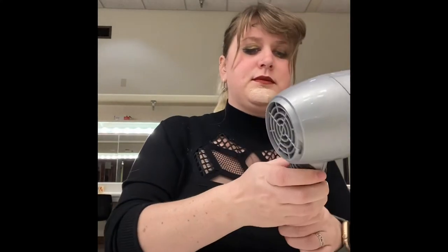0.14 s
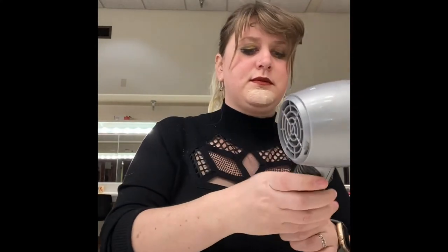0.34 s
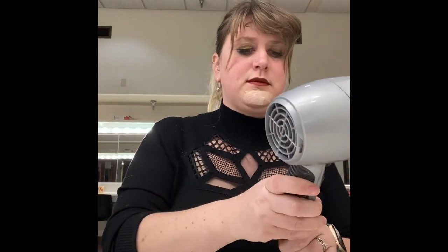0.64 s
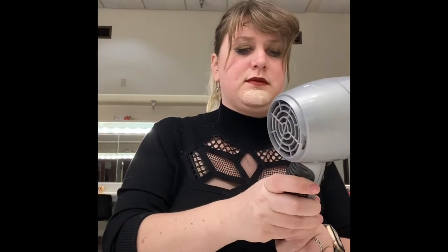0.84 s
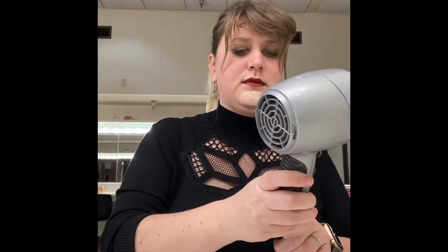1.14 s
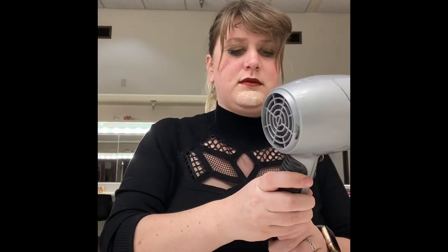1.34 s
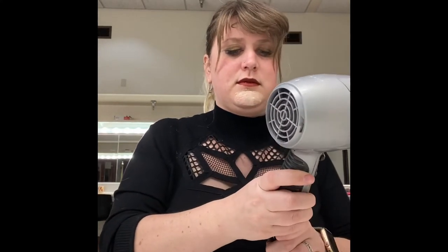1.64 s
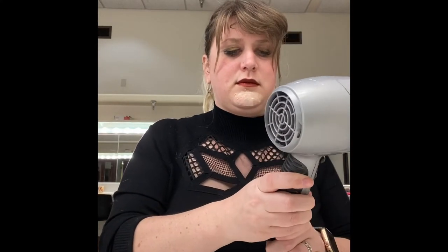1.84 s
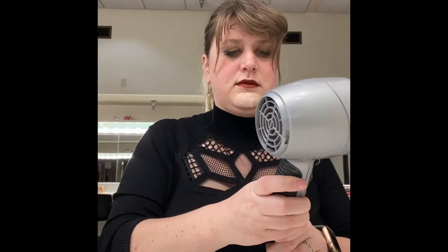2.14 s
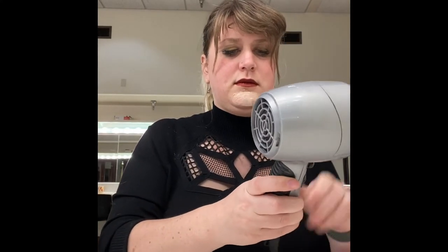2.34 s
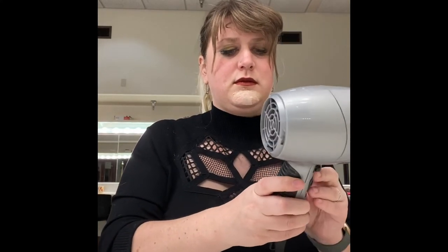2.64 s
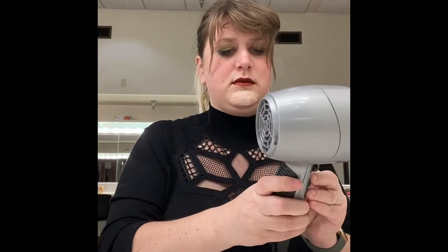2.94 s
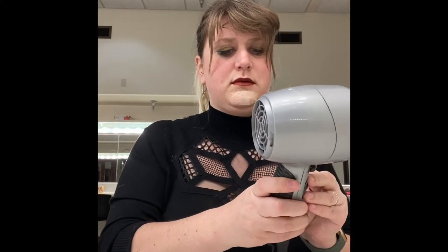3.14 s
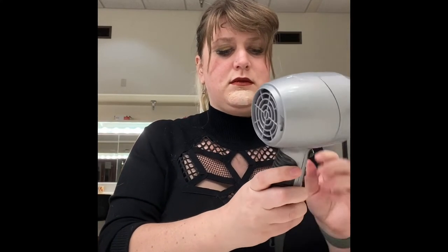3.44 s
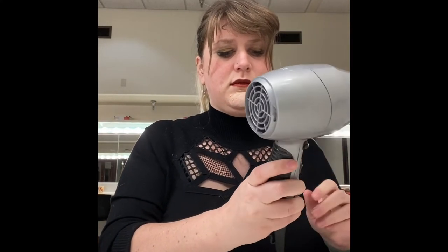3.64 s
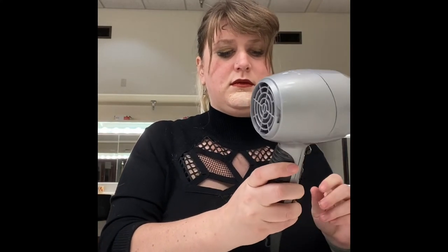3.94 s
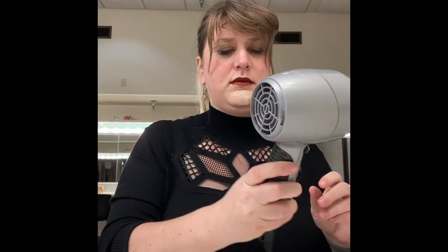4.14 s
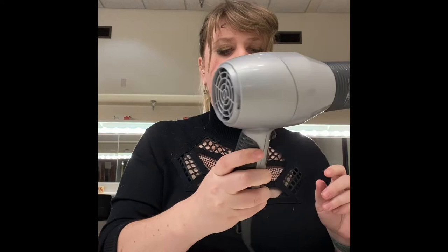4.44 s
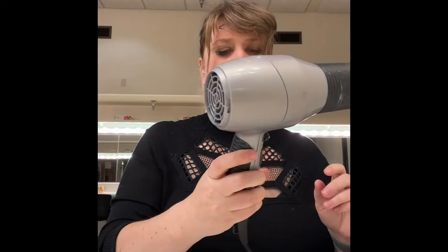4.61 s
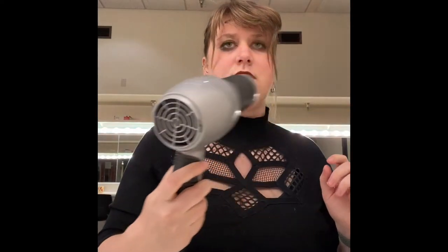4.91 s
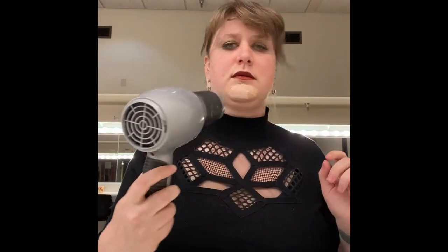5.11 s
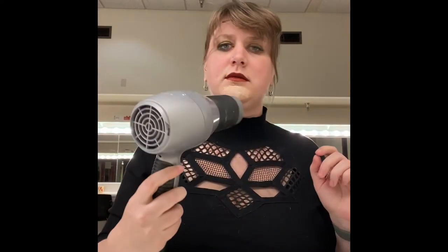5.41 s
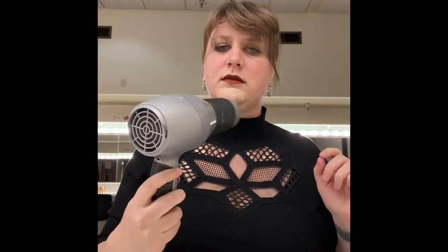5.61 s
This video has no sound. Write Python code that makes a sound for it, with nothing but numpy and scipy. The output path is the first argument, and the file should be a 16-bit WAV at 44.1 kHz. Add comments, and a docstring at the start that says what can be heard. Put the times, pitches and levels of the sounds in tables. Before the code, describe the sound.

In a large hard room with a low ventilation rumble, a switch clicks and a hair dryer an arm's length away spins up with rushing air and a rising whine. It soon coasts down, and something hollow knocks far off. Faint sleeve rustle and more clicks fill the pause. The dryer gives a brief burst, then clicks on again and keeps blowing with a steady whistle.

```python
"""A hand-held hair dryer is switched on three times, an arm's length away in a large hard room.
Its motor spins up and coasts down: the fan whines at multiples of its turning speed, and air
rushes through the same plastic barrel, which colours both sounds. A ventilation rumble,
sleeve rustle, switch clicks and a knock far off in the room fill the pauses."""
import sys
import numpy as np
from scipy import signal
from scipy.fft import rfft, irfft, next_fast_len
from scipy.io import wavfile
from scipy.ndimage import uniform_filter1d

SR = 44100
rng = np.random.default_rng(int(sys.argv[2]) if len(sys.argv) > 2 else 0)


def put_to_file(sound):
    """Save the sound as 16-bit audio at rate SR, in the file named by the first command-line argument."""
    columns = np.atleast_2d(sound).T  # one column per channel
    safe = np.clip(columns, -1, 1)
    whole_steps = np.round(safe * 32767)
    wavfile.write(sys.argv[1], SR, whole_steps.astype(np.int16))


N = 254456
T = np.arange(N) / SR
FULL_SPEED_HZ = 325.5  # turns of the motor per second

# How the dryer's loudness, treble, whistle and low rush rise and fall over time:
# (time [s], overall gain [dB], treble change [dB], whistle gain [dB], low rush gain [dB])
DRYER_CURVES = [(0.75, -24, 8, 0.5, 0), (0.95, -25.5, -1, 0, 0), (1.2, -23, -2, 0, 0),
                (1.38, -25, 0, -7.5, -1), (1.55, -26.5, 1, 1, -3), (1.63, -26, 0, -1, -1),
                (1.69, -25, 0, 0, 2), (1.78, -25.5, 0, 0, -2), (2.0, -27, 1.5, -1, -1),
                (2.4, -32, -4.5, -1, 0), (3.7, -37, -3.5, 0.5, 0), (3.82, -26, 2.5, 0, 0),
                (3.94, -26, -4, 0, 0), (4.2, -26.5, 0, -0.5, 2), (4.45, -24, -7, -3, 3),
                (4.58, -23, -6, -5, 4), (4.68, -22.5, -6, -4, 0), (4.76, -23, -4, 0, -2),
                (4.9, -24, -3, 4, -1), (5.02, -26, 0, 5, -1), (5.12, -27, 0, 0, -1),
                (5.25, -27.5, .5, -2, -1), (5.5, -26.5, 0, 0, -2), (5.77, -28.5, 1.5, -2, -1)]


def undb(db):
    return 10 ** (np.asarray(db) / 20)


def level(x, db):
    """Scale a sound to an average (RMS) level."""
    return x * undb(db) / np.sqrt(np.mean(x ** 2))


def along(table, hz, column=1):
    """Read between a table's rows on a log-frequency axis."""
    rows = np.array(table, float)
    return np.interp(np.log(np.maximum(hz, 1)), np.log(rows[:, 0]), rows[:, column])


def shaped(x, db_at):
    """Filter by a function from Hz to dB."""
    size = next_fast_len(len(x))
    hz = np.arange(size // 2 + 1) * SR / size
    return irfft(rfft(x, size) * undb(db_at(hz)), size)[:len(x)]


def band(x, lo_hz, hi_hz, order=2):
    return signal.sosfilt(signal.butter(order, [lo_hz, hi_hz], "band", fs=SR, output="sos"), x)


def lowpass(x, hz):
    return signal.sosfilt(signal.butter(2, hz, fs=SR, output="sos"), x)


def bump(hz, centre_hz, width_hz):
    """A resonance curve: 1 at the centre, less to either side."""
    return 1 / (1 + (2 * (hz - centre_hz) / width_hz) ** 2)


def wander(per_second):
    """A smooth random wobble with a spread near 1."""
    hold = int(SR / per_second)
    steps = np.repeat(rng.standard_normal(N // hold + 1), hold)
    return 1.217 * uniform_filter1d(uniform_filter1d(steps, hold), hold)[:N]


def place(out, start_s, sound):
    return out + np.pad(sound, (int(start_s * SR), N))[:N]


def room_echo(low_s, high_s, length_s=0.898):
    """Dense reflections: noise whose lows and highs each have their own time to fade 60 dB."""
    t = np.arange(int(length_s * SR)) / SR
    noise = rng.standard_normal(len(t))
    low = lowpass(noise, 1500)
    echo = (low * undb(-60 * t / low_s) + (noise - low) * undb(-60 * t / high_s)) * (1 - t / length_s)
    return echo / np.sqrt(np.sum(echo ** 2))


def ventilation():
    """Ventilation rumbles, with a thin hiss above it and a wavering mains hum."""
    # Tone of the rumble: (frequency [Hz], relative level [dB])
    tone = [(20, -39), (30, -21), (40, -3), (50, -6), (60, 0), (76, -1.5), (100, -3.5), (144, -6),
            (169, -13), (225, -21.5), (327, -25.5), (631, -27), (897, -38.5), (1300, -40.5), (1600, -43.5),
            (2300, -43.5), (2970, -47), (5000, -58), (6000, -78), (9000, -86.5)]
    rumble = level(shaped(rng.standard_normal(N), lambda f: along(tone, f)), db=-38)
    rumble *= undb(.6 * wander(1.859))
    hum_hz, hum_db = 59.67, -48
    return rumble + undb(hum_db + 1.2 * wander(2.97)) * np.sin(2 * np.pi * hum_hz * T)


def sleeve_rustle():
    """Cloth rubs in faint, grainy swells, with a thin hiss when it slides."""
    # Sleeve movements: (loudest moment [s], time to fade 20 dB [s], rub level [dB], hiss level [dB])
    moves = [(0.03, 0.25, -55, -76.5), (.17, 0.05, -65.5, -76), (.35, 0.22, -54.5, -83),
             (.5, .12, -63, -79), (2.5, 0.2866, -69.5, -63), (2.97, 0.01, -75, -75.5),
             (3.06, 0.0854, -64, -70), (3.3, 0.103, -55, -76), (3.55, 0.6, -72.5, -93),
             (3.78, 0.2, -66, -71.5)]
    # Tone of rubbing cloth: (frequency [Hz], relative level [dB])
    cloth = [(530, -32), (900, -0.5), (1460, -7), (1980, 2), (2560, 0.5), (3620, -14), (4690, -12),
             (5640, -22.5), (11900, -38), (15400, -60), (22000, -120)]
    rub = level(shaped(rng.standard_normal(N), lambda f: along(cloth, f)), 0)
    hiss = level(band(rng.standard_normal(N), 3600, 9800, order=6), 0)
    out = np.zeros(N)
    for peak_s, fade_s, rub_db, hiss_db in moves:
        swell = undb(-20 * np.maximum(T - peak_s, (peak_s - T) / 0.487) / fade_s)  # rises faster
        out += swell * (undb(rub_db) * rub + undb(hiss_db) * hiss)
    return out * undb(2.0 * wander(39.88))


def switch_clicks():
    """A switch or finger makes a short crack and the handle rings; the room answers faintly."""
    # Clicks: (time [s], peak level [dB], boost of the low ringing [dB], treble limit [Hz])
    clicks = [(0.1594, -52.5, -7.5, 6000), (0.684, -30.5, -2, 6520), (0.7392, -31.5, 2, 4500),
              (2.4751, -32.5, -6.5, 7000), (2.86, -59.5, -7.5, 7000), (2.93, -56, -8, 7000),
              (3.0284, -20.5, -5, 11100), (3.229, -49, -6.5, 7000), (3.2954, -41, -1, 6000),
              (3.4077, -50.5, -10.5, 7900), (3.7165, -36.5, 5.5, 2500), (4.119, -29.5, 12.5, 1500),
              (4.2512, -22, 7, 9800)]
    # The handle's ringing tones: (frequency [Hz], relative level [dB], time to fade 60 dB [s])
    handle = [(640, -3, .028), (810, -5, .022), (1150, -6, .013), (1600, -6, .010), (2300, -3, .010),
              (3050, -3, .008), (4700, -1.5, .005), (6200, -5, .006), (8100, -7, .005), (10800, -11, .004)]
    t, out = T[:int(.06 * SR)], np.zeros(N)
    for start_s, peak_db, body_db, top_hz in clicks:
        phases, detunes = rng.random((2, len(handle)))
        ring = 0
        for (hz, db, fade_s), phase, detune in zip(handle, phases, detunes):
            build = np.minimum(t * hz / 2.81, 1)  # takes about three cycles
            fade = undb(db + (body_db if hz < 2600 else 0) - 60 * t / fade_s)
            ring += build * fade * np.sin(2 * np.pi * (hz * (0.9235 + 0.1367 * detune) * t + phase))
        crack = undb(-1.0 - 60 * t / 0.0218) * band(rng.standard_normal(len(t)), 500, 10000, order=1)
        attack = np.minimum(t / 0.001234, 1)
        # each click has its own treble limit, from dull knock to bright snap
        hit = band((ring + crack) * attack, 438, top_hz)
        out = place(out, start_s, hit * undb(peak_db) / np.abs(hit).max())
    echo = signal.fftconvolve(out, room_echo(0.306, 0.224))[:N]
    return out + undb(-9.0) * band(echo, 300, 9300, order=4)


def motor_speed():
    """Switched on, the motor eases up to full speed; off, air drag (speed squared) slows it."""
    # Switching the motor: (time [s], state [1 on, 0 off])
    switches = [(0.742, 1), (1.612, 0), (3.795, 1), (3.942, 0), (4.265, 1)]
    spin_up_s, drag_per_turn = .236, 0.011
    hz = np.full(N, 1.)
    for start_s, on in switches:
        i = int(start_s * SR)
        t = T[i:] - T[i]
        if on:
            hz[i:] = FULL_SPEED_HZ + (hz[i] - FULL_SPEED_HZ) * np.exp(-t / spin_up_s)
        else:
            hz[i:] = hz[i] / (1 + drag_per_turn * hz[i] * t)
    return hz


def barrel_db(hz, facing=0):
    """The broad tone of the air stream, with the peaks and dips of barrel and grille on top."""
    # Tone of the air stream: (frequency [Hz], relative level [dB])
    stream = [(120, -38.5), (233, -16), (439, -14.5), (628, -5), (800, -11.5), (1000, -16.5), (1330, -12),
              (1550, -23.5), (1850, -12.5), (2400, -5), (2920, -16.5), (4190, -20.5), (4880, -24),
              (8150, -22), (10200, -28.5), (11300, -35.5), (12300, -62), (16000, -87.5)]
    # Peaks and dips: (frequency [Hz], width [Hz], gain side-on [dB], gain with intake facing us [dB])
    resonances = [(632, 45, 6, 3), (802, 38, 2, 3), (960, 42, 1.5, -2), (1232, 78, 3, 3),
                  (1317.3, 110, 2, 4.5), (1770, 114, -1, -5.5), (1852, 52, 3, -1), (2280, 150, 3.5, 0),
                  (2486.3, 43, 3.5, 8.5), (2670, 59, -0.5, -5), (2771, 35, 3, 7), (3068, 71, 5.5, 2),
                  (3282, 61, 0, 4), (3490, 90, -1.5, -5), (3566, 68, 2.5, 1), (3869, 117, -1, 4),
                  (4208, 170, 4, 4.5), (4514, 151, 5, 2), (4900, 250, -3.5, -5.5), (5246, 150, 0.5, 4),
                  (6020, 200, -0.5, 1), (6450, 100, 1, 1.5), (6720, 200, 3.5, -2), (7296, 270, 3.5, -2.5),
                  (7964, 250, 0, 2.5)]
    return along(stream, hz) + sum((side_db + facing * (front_db - side_db)) * bump(hz, centre, width)
                                   for centre, width, side_db, front_db in resonances)


def curve_db(column):
    """One column of DRYER_CURVES over time."""
    rows = np.array(DRYER_CURVES)
    return np.interp(T, rows[:, 0], rows[:, column])


def air_rush(speed_db, facing):
    """Churning air grows steeply louder with fan speed, the top treble fastest."""
    noise = rng.standard_normal(N)
    side_on, front_on = shaped(noise, barrel_db), shaped(noise, lambda f: barrel_db(f, 1))
    air = level((1 - facing) * side_on + facing * front_on, 0)
    treble_db, low_db = curve_db(2), curve_db(4)
    # (low edge [Hz], high edge [Hz], growth [dB per dB of speed], gain over time [dB])
    bands = [(1, 1600, 1.617, low_db + 0.17 * treble_db), (1600, 3000, 3.0, 0),
             (3000, 5000, 2.675, 0.815 * treble_db), (5000, 40000, 3.48, 0.7 * treble_db)]
    out = np.zeros(N)
    for low, high, growth, gain_db in bands:
        part = shaped(air, lambda f: -10 * np.log10(1 + (low / (f + 1)) ** 8 + (f / high) ** 8))
        out += part * undb(growth * speed_db + gain_db + wander(13))
    return out


def whistle_breath(angle):
    """Churning air adds a breathy band just under the whistle, at 7.75 times the motor speed."""
    return level(lowpass(rng.standard_normal(N), 70), -8) * np.sin(7.75 * angle)


def singing_air(whistle_hz):
    """A narrow air resonance sings while the whistle's pitch is near it."""
    centre_hz = 2490
    sing = level(band(rng.standard_normal(N), centre_hz - 18, centre_hz + 18), -5.5)
    return sing * bump(whistle_hz, centre_hz, width_hz=220)


def blade_whistle_db(hz, coasting):
    """The whistle catches above a pitch, swells at a resonance and holds on lower when coasting."""
    catch_hz = np.where(coasting, 1780, 2203)
    uncaught_db = -15.5 / (1 + np.exp((hz - catch_hz) / 31))
    return uncaught_db + 9 * bump(hz, 2360.4, width_hz=335) + curve_db(3)


def fan_whine(hz, speed_db, facing, coasting):
    """Tones at multiples of the motor speed sound through the barrel; multiple 8 is the whistle."""
    # Tones: (multiple of the motor speed, base level [dB], growth [dB per dB of speed])
    tones = [(2, -28, .6), (3, -22, .1), (4, -17, .3), (6, -25, .2), (8, -10, 1.5), (10, -22, 1.2),
             (12, -23, 1.2), (13, -22, 1.2), (16, -20, 1.5)]
    angle = 2 * np.pi * np.cumsum(hz) / SR
    side_on, front_on = barrel_db(np.arange(6000.)), barrel_db(np.arange(6000.), 1)
    out = np.zeros(N)
    for multiple, db, growth in tones:
        whole_hz = (multiple * hz).astype(int)
        colour_db = (1 - facing) * side_on[whole_hz] + facing * front_on[whole_hz]
        colour_share = .75 if multiple >= 8 else .35
        waver_db = wander(22) + 2.2 * wander(110)
        gain_db = db + colour_share * colour_db + growth * speed_db + waver_db
        tone = np.sin(multiple * angle)
        if multiple == 8:
            tone += whistle_breath(angle)
            gain_db += blade_whistle_db(8 * hz, coasting)
        out += undb(gain_db) * tone
    return out * undb(9) / (1 + (122 / hz) ** 8)  # dies away below 122 turns a second


def hair_dryer():
    """One motor drives both rush and whine; near the end the intake turns to face us."""
    smooth_hz = motor_speed()
    hz = smooth_hz * (1 + 0.0025 * wander(40))
    speed_db = 20 * np.log10(hz / FULL_SPEED_HZ)
    turn_at_s, turn_takes_s = 4.977, .3
    facing = np.clip((T - turn_at_s) / turn_takes_s + .5, 0, 1)
    gain = undb(curve_db(1))
    rush = gain * (air_rush(speed_db, facing) + singing_air(8 * hz))
    whine = gain * fan_whine(hz, speed_db, facing, coasting=np.gradient(smooth_hz) < 0)
    # the room holds on to the pitches just passed and blurs the glides
    echo = signal.fftconvolve(whine, room_echo(0.614, 0.558))[:N]
    return rush + whine + undb(-6.5) * echo


def far_knock():
    """Something hollow is set down far away, heard mostly as a quick echo and a longer one."""
    # The knock and its rebounds: (time [s], thud level [dB], treble tilt [dB per two octaves])
    hits = [(2.045, -31, -13), (2.058, -34.5, 4), (2.085, -38, -5.5), (2.215, -52, -6), (2.245, -45.5, -11),
            (2.30, -53, -10)]
    # Tone of the thud: (frequency [Hz], relative level [dB])
    tone = [(76, -39.5), (130, -11), (200, -9.5), (260, -16), (400, -10), (567, 2), (700, -4.5), (1050, -3),
            (1490, -16), (2250, -6.5), (3290, -21), (7980, -30.5), (11000, -39.5), (12500, -61),
            (16000, -89)]
    # The hollow thing's ringing: (frequency [Hz], relative level [dB], time to fade 60 dB [s])
    hollow = [(581, 0, .04), (818, -2, .05), (1012, -2, .05), (1222, -8, .04)]
    tilt = lambda f: np.log2(np.clip(f, 500, 4000) / 1000) / 2
    out = np.zeros(N)
    for start_s, db, tilt_db in hits:
        echo = room_echo(0.326, 0.298) + undb(-5.5) * room_echo(0.79, 0.59)
        t = T[:len(echo)]
        thud = shaped(np.pad(echo, (0, SR // 10)), lambda f: along(tone, f) + tilt_db * tilt(f))[:len(t)]
        thud *= np.sin(np.pi / 2 * np.minimum(t / 0.002, 1)) ** 2  # the thud fades in over the first two milliseconds
        ring = sum(undb(ring_db - 60 * t / fade_s) * np.sin(2 * np.pi * hz * t)
                   for hz, ring_db, fade_s in hollow)
        out = place(out, start_s, level(thud, db) + undb(db + 5) * ring / np.abs(ring).max())
    return out


def two_microphones(x):
    """Left and right differ in level and phase: partly the sound itself, partly its room scatter."""
    # The pair: (frequency [Hz], likeness [0-1], left minus right [dB], right's lead [radians])
    pair = [(60, .9995, 1.1, 0), (170, .997, 2.1, .06), (280, .72, 6.5, .8), (550, .9, 4, 1.1),
            (860, .5, -1, .5), (1200, .83, 2.5, .7), (1550, .55, 2, .5), (2200, .96, 3, 1.1),
            (2700, .88, .6, .8), (3400, .3, 1, -.5), (4600, .75, 2, 2.4), (5300, .55, -1, 1.8),
            (5800, .78, 0, .2), (6600, .88, .2, .2), (8200, .75, .4, .7), (9800, .62, 0, 1.6),
            (11000, .65, 0, 2.5), (11900, .94, 0, 2.9)]
    size = next_fast_len(N + SR // 2)
    hz = np.arange(size // 2 + 1) * SR / size
    likeness = np.clip(along(pair, hz), 0, 1)
    left = undb(along(pair, hz, column=2) / 2)
    lead = along(pair, hz, column=3)
    power, shared = left ** 2 + left ** -2, 2 * likeness * np.cos(lead)
    mid, side = power + shared, power - shared
    direct = (left ** 2 - left ** -2 - 2j * likeness * np.sin(lead)) / mid
    scatter = np.sqrt(np.maximum(side / mid - np.abs(direct) ** 2, 0))
    room = rfft(room_echo(0.183, 0.189, length_s=.3), size)
    apart = irfft(rfft(x, size) * (direct + scatter * room), size)[:N]
    return np.array([x + apart, x - apart])


def scene():
    return two_microphones(hair_dryer() + switch_clicks() + far_knock() + sleeve_rustle() + ventilation())


def record(dry):
    """The highest treble, above 15800 Hz, is cut away."""
    return signal.sosfilt(signal.ellip(8, .2, 70, 15800, fs=SR, output="sos"), dry)


dry = scene()
out = record(dry)
put_to_file(out)
```